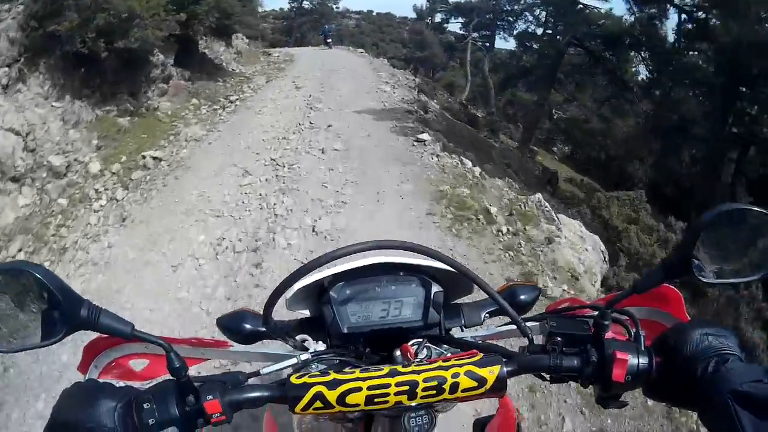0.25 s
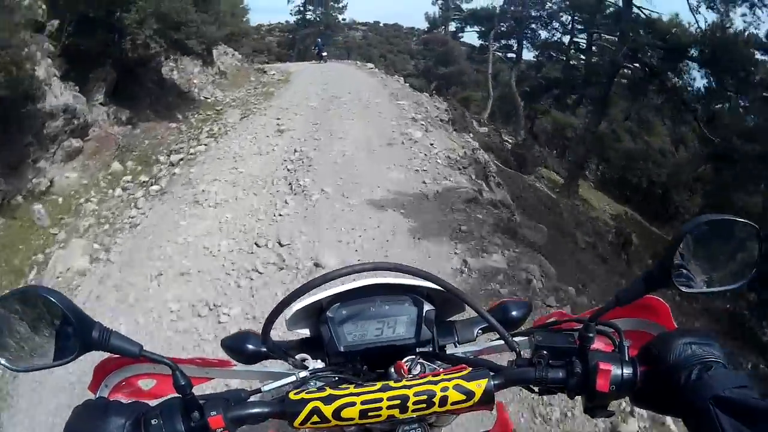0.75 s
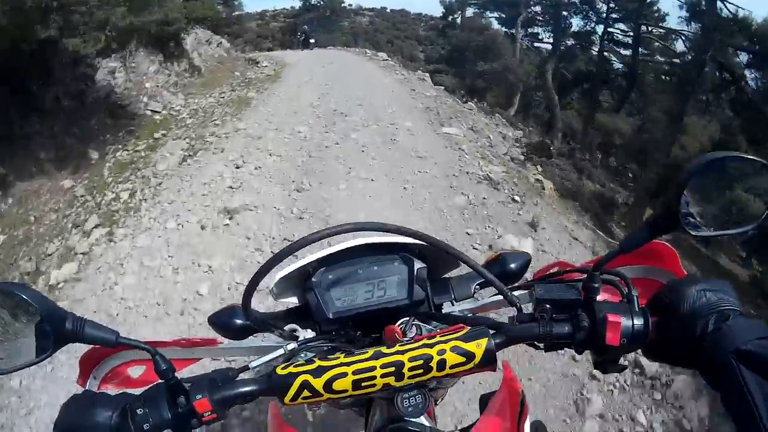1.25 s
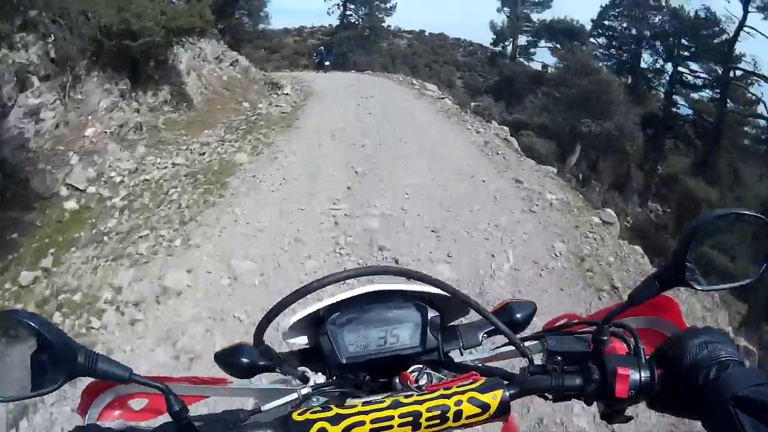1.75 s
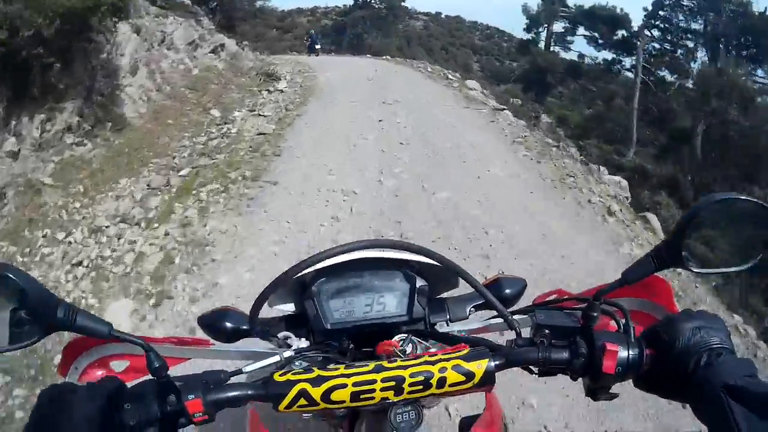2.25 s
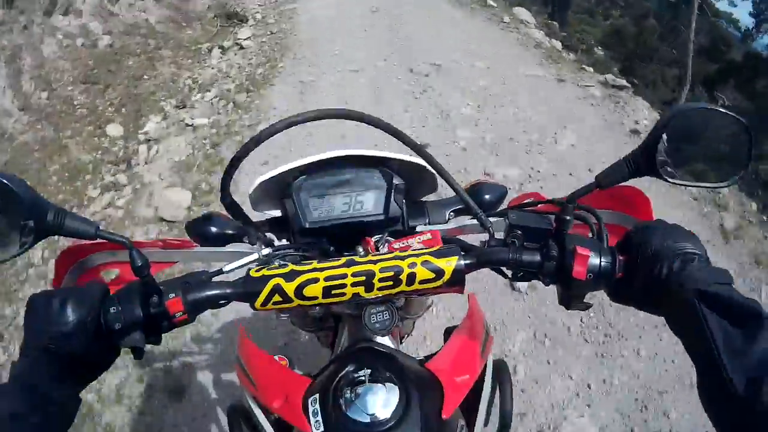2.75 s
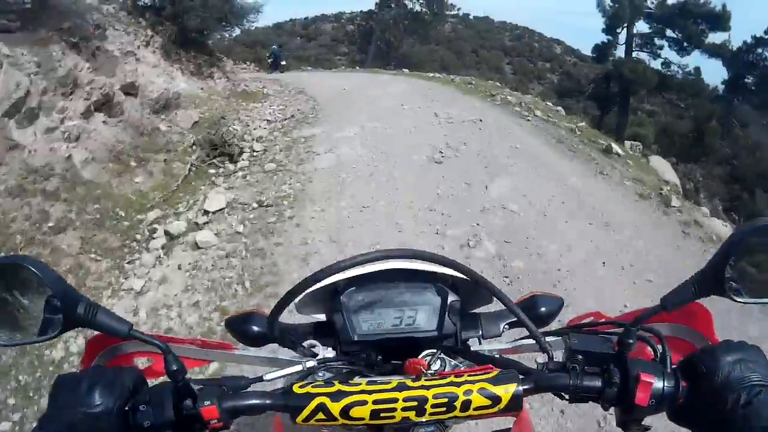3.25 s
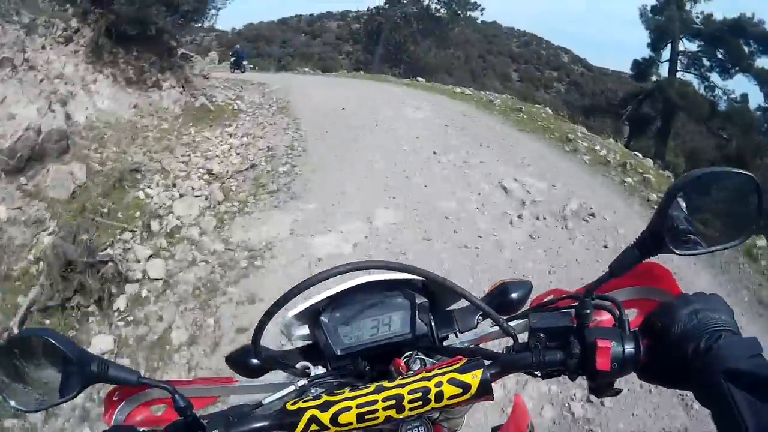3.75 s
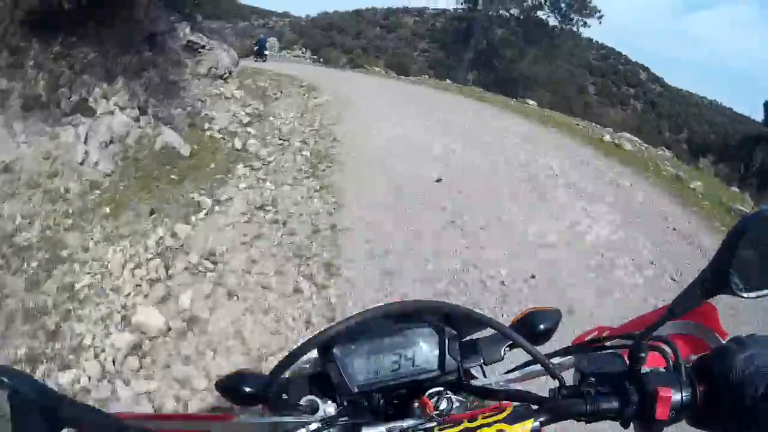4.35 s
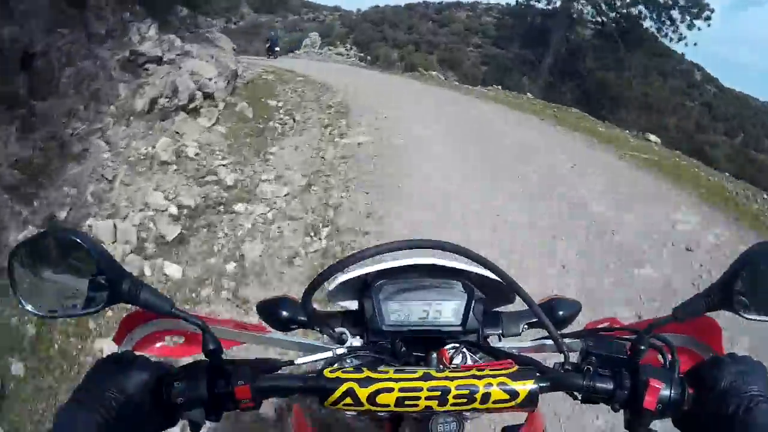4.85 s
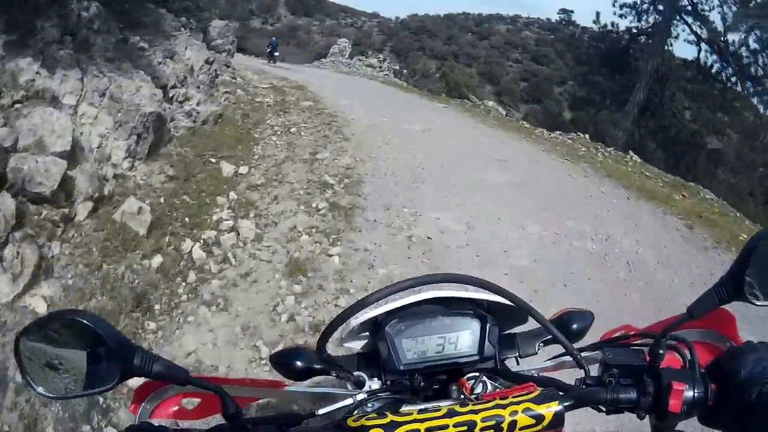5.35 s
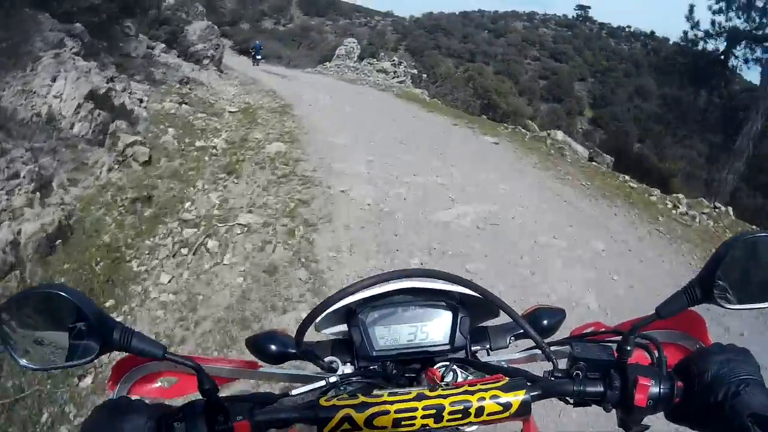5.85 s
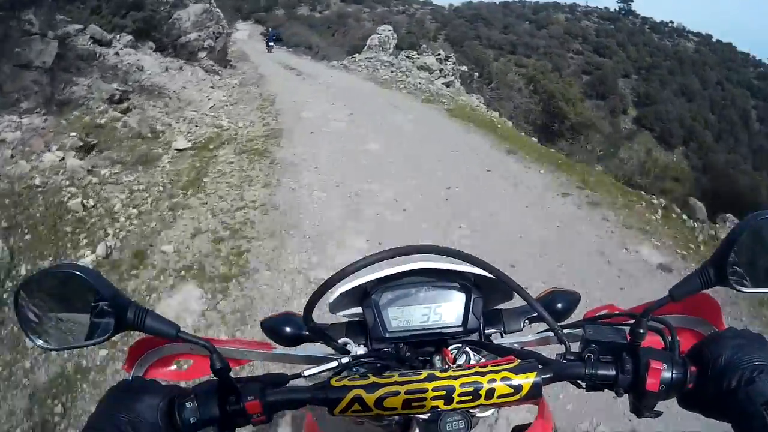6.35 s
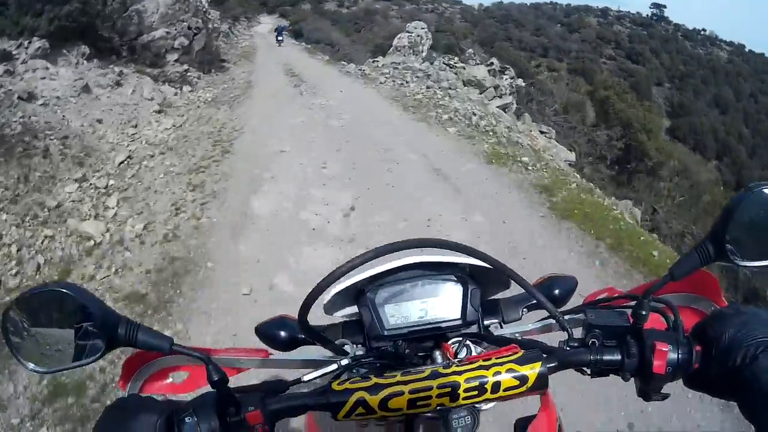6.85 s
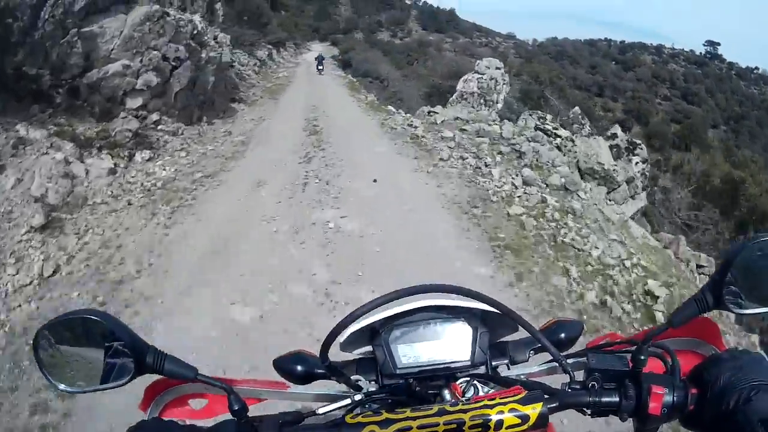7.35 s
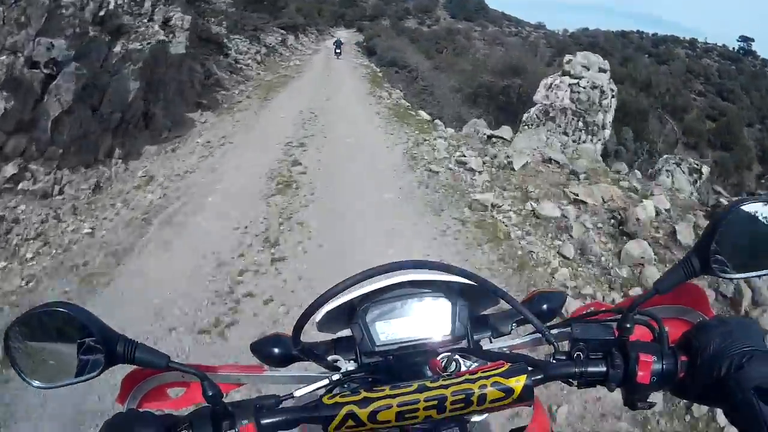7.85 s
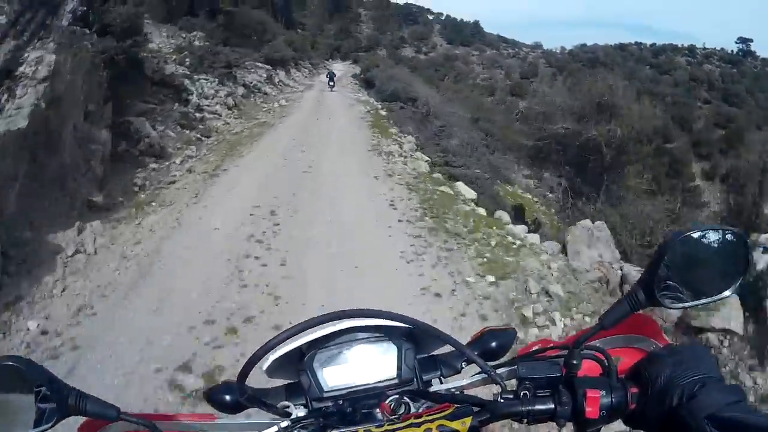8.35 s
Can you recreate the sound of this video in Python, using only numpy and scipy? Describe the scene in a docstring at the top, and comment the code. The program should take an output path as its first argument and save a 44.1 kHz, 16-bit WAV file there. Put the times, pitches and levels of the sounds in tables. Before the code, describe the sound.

Close, muffled onboard sound of a trail motorcycle on an open gravel hillside road. Rapid engine beats and metallic valve clatter run continuously, brighter with chain noise at first, then lower and calmer after the throttle shuts. A rough patch early on brings a cluster of dull knocks and rattles; later come scattered lighter bumps and one big bang. Gravel rumble, soft wind buffets and steady microphone hiss continue, without spacious echo.

```python
"""A single-cylinder four-stroke trail bike beats and clatters, heard from a closed camera housing on the rider.
Firings and valve gear ring the engine cases; the revs climb, drop, then pull gently again.
Stones on the track knock through the suspension and set the housing booming; grit crunches, loose metal jingles.
Pebbles tick against the bike; tyre rumble, air buffeting and a steady hiss lie underneath."""
import sys
import numpy as np
from scipy import signal
from scipy.fft import rfft, irfft, next_fast_len
from scipy.io import wavfile
from scipy.ndimage import uniform_filter1d

SR = 44100
rng = np.random.default_rng(int(sys.argv[2]) if len(sys.argv) > 2 else 0)


def unload_wav(signal):
    """Save mono or channel-first audio to the path in sys.argv[1] as 16-bit WAV at rate SR, clipped to [-1, 1]."""
    wavfile.write(
        sys.argv[1],
        SR,
        np.round(np.clip(np.atleast_2d(signal).T, -1, 1) * 32767).astype(np.int16),
    )


N = 379260
TIME_S = np.arange(N) / SR

# engine speed: (time [s], firing rate [Hz])
REVS = [(0, 37.7), (.55, 37.7), (.82, 38.2), (1.3, 39.4), (1.48, 38.6), (2.18, 41), (2.55, 41),
        (2.82, 38.8), (3.3, 31.5), (3.5, 28.8), (3.8, 28.1), (4.26, 29.8), (4.8, 28.4), (5.75, 28.7),
        (6.85, 29.4), (7.3, 29.7), (8.12, 30.4), (8.6, 31.1)]
# rasp before its makeup gain: (time [s], level [dB])
RASP_LEVEL = [(0, -62.5), (.9, -62), (1.63, -59), (2.35, -57.5), (3.0, -63), (4.25, -61.5), (5.1, -62.5),
              (5.9, -63), (7.6, -63.5), (8.6, -61.5)]
# gear mesh tones: (multiple of firing rate, rounded [1], level under drive before trim [dB], overrun change [dB])
GEARS = [(34, -66, 7), (52, -65.5, 16), (69.5, -54, -1)]
# track roughness over smooth gravel: (time [s], level [dB])
GROUND = [(0, 1.5), (.5, 0), (1.4, 4.5), (1.8, 8.5), (2.15, 7), (2.45, 8.5), (2.65, 3.5), (2.92, 7),
          (3.25, -0.5), (3.7, 4), (3.98, 2), (4.4, 2.5), (4.9, -2), (5.55, -1.5), (6.3, -3), (6.8, 4.5),
          (7.2, -1.5), (8.6, 0.5)]
# big stones, before layer trims: (time [s], thud [dB], boom re thud [dB], rattle re thud [dB])
KNOCKS = [(1.2607, -32.5, -2.5, -19), (1.387, -35, 5, -17), (1.5375, -36, -13, -9.5),
          (1.5855, -25, -20, -25), (1.6652, -24.5, -1, -24), (1.7143, -24.5, 0, -24),
          (1.755, -12.5, -3, -21.5), (1.8973, -38.5, 9, -15), (2.1936, -34.5, 7, -17.5),
          (2.4, -27.5, 8.5, -16), (2.4467, -9.5, -3.5, -30), (2.657, -36.5, 0, -17.5),
          (2.8948, -30.5, 4, -22), (2.9796, -20.5, -0.5, -46), (3.1558, -30.5, 1, -38),
          (3.493, -29, 4, -25), (3.705, -39, 9, -18.5), (3.8584, -38, 3, -31), (4.1254, -28, 2.5, -23),
          (4.2638, -35.5, 7.5, -32), (4.3121, -40, 14, -29), (4.352, -37, 10.5, -18),
          (4.4366, -29, 6.5, -38), (4.715, -33, 2, -32), (5.243, -38, 6, -30), (5.2687, -32, 2, -25),
          (5.449, -37.5, -8, -35), (5.6112, -37.5, 9.5, -29), (5.8588, -37, 8.5, -24.5),
          (6.0364, -41.5, 5, -37), (6.1968, -35, 3.5, -29), (6.24, -39.5, 4, -17),
          (6.5056, -26.5, -13.5, -23), (6.671, -31, 4, -28), (6.7506, -8.5, -1.5, -28),
          (6.9394, -34.5, 4, -26), (7.0112, -23, -6, -17.5), (7.3456, -29.5, 0, -27),
          (7.395, -38, 11.5, -25), (8.2007, -35.5, 3.5, -22)]
# spells of swinging loose metal: (start [s], length [s], level [dB])
JINGLES = [(1.53, .16, -57), (1.945, .13, -58), (2.183, .11, -53.5), (2.561, .48, -59), (4.109, .2, -55.5),
           (6.54, .22, -58.5)]
# flung pebbles, before makeup gain: (time [s], level [dB])
PEBBLES = [(1.5399, -49), (2.3999, -47.5), (2.7252, -52), (4.2892, -49), (4.36, -50), (6.752, -48),
           (7.0107, -53), (8.4726, -47)]

# resonances of engine block, engine cases and cam chain: (frequency [Hz], width [Hz], relative level [dB])
BLOCK_MODES = [(257.6, 27, 2.5), (481.7, 35, 2.5), (627, 20.4, 5), (1002, 19, -6.5)]
CASE_MODES = [(1324, 59.5, 2), (1640, 100, -5.5), (1768, 55.5, 3.5), (2173, 98, -3), (2332, 30, -5)]
CHAIN_MODES = [(2390, 50, 2), (2590, 90, -5), (2767, 103, -4.5), (2960, 82, 1.5), (4255, 114, -18.5)]
# resonances of frame, housing, springs, loose parts and jingling metal: same columns
FRAME_MODES = [(180, 29, 0.5), (243.7, 36.5, 1), (308.4, 41, -1), (368.3, 45, -1.5), (646, 15.5, -6.5)]
HOUSING_MODES = [(94.9, 8.8, -0.21)]
SPRING_MODES = [(58, 13.5, 1.5), (166, 15.8, 3.2)]
RATTLE_MODES = [(1355, 67, -1.5), (1593, 164, 4), (1674, 316, 1), (2240, 170, -15), (2800, 80, -7.5)]
JINGLE_MODES = [(6400, 70, -3), (8080, 28, 2), (10300, 70, -7), (11290, 35, 3), (11770, 32, 4),
                (13000, 70, -9), (15650, 40, -7)]

# spectra of exhaust, rasp, crunch, tyre rumble, air buffeting and hiss: (frequency [Hz], relative level [dB])
EXHAUST = [(20, 25), (38, 24), (76, 7), (105, -22), (150, 6), (220, -22), (270, 17), (340, -16), (420, 1),
           (700, -41), (1200, -66)]
RASP = [(300, 10), (700, 2.5), (1130, -8), (1300, 7), (2250, 5.5), (2550, -10), (3050, -2.5), (3400, -9),
        (3900, -5), (4450, -2), (4900, -11.5), (6100, -12.5), (7000, -27), (15000, -33)]
CRUNCH = [(200, -41), (330, -38), (500, 9), (660, 5), (800, -2), (1050, -6.5), (1400, -5.5), (2200, -21),
          (6000, -37), (15000, -63)]
RUMBLE = [(30, -23), (60, -34), (80, 1.5), (100, 6.5), (125, -3), (160, -0.5), (210, -3.5), (290, -4),
          (390, -19.5), (450, -20), (650, -14.5), (900, -51), (2500, -56)]
BUFFET = [(8, -5), (22, 11), (40, 2), (65, -5), (100, -37), (250, -32), (1000, -79)]
HISS = [(100, 7), (3000, 1), (7000, 2), (10000, 1), (14000, 0), (15500, -4.5)]

# engine: reference levels at CRUISE_HZ, before layer trims
CRUISE_HZ = 30
CLATTER_DB, CLATTER_DB_PER_OCTAVE = -53.5, 3
CHAIN_DB, CHAIN_DB_PER_OCTAVE = -66.5, 17
OVERRUN_HZ_PER_S = 13  # fall of the revs that counts as throttle fully shut
SURGE_RAD = .9  # swing of the mesh phase within a cycle
# suspension rebound: least delay, extra random delay, strength re stone, ceiling
REBOUND_S, REBOUND_SPREAD_S, REBOUND_DB, REBOUND_TOP_DB = .018, .02, -7.5, -38.5
# small stones on smooth gravel; shares are dB per dB of roughness
JOLTS_PER_S, JOLT_RATE_SHARE = 1.8, 1.8
JOLT_DB, JOLT_GROUND_SHARE, JOLT_SPREAD_DB = -45, 1, 4.5
LIGHT_BOOM_DB, LIGHT_RATTLE_DB = 6.5, -25  # rebounds and small stones: re thud, before trims
CRUNCH_ATTACK_S, CRUNCH_DECAY_S = 0.0015, 0.013
CRUNCH_DB, CRUNCH_THUD_SHARE = -20, 0.67  # at a 0 dB thud; dB per dB of thud
SWING_S, SWING_SPREAD_DB = .075, 2.2  # mean time between swings; spread of their strength
TYRE_DB = -52  # smooth gravel, before trim
BUFFET_DB, BUFFET_GROUND_SHARE = -57.5, 1.3  # before trim; dB per dB of roughness
SHAKE_DB, SHAKE_DECAY_S = -22, 0.06  # housing sway impulse re boom, before softening
TOP_HZ = 15700


def undb(db):
    """Decibels to gain."""
    return 10 ** (np.asarray(db) / 20)


def level(x, db):
    """Scale a sound to an rms level."""
    return x * undb(db) / np.sqrt(np.mean(x ** 2))


def curves(table):
    """Each column of a table as a line through time."""
    time_s, *columns = np.transpose(table)
    return [np.interp(TIME_S, time_s, column) for column in columns]


def walk(rate_hz):
    """Smooth random drift with an rms of 1."""
    hold = int(SR / rate_hz)
    draws = rng.standard_normal(400)[np.arange(N // hold + 1) % 400]
    held = np.repeat(draws, hold)
    smooth = uniform_filter1d(uniform_filter1d(held, hold), hold)
    return level(smooth[:N], 0)


def colour(x, points):
    """Filter by a spectrum, interpolated in dB over log frequency."""
    hz, db = np.transpose(points)
    size = next_fast_len(len(x) + SR // 4)
    bin_hz = np.maximum(np.arange(size // 2 + 1) * SR / size, 1)
    gain = undb(np.interp(np.log(bin_hz), np.log(hz), db))
    return irfft(rfft(x, size) * gain, size)[:len(x)]


def ring(x, modes, detune=0., scatter_db=0., signs=(1, -1)):
    """Drive resonances that swing with or against each other; the point of contact shifts pitch and share."""
    out = 0
    x = x + 1e-18 * np.cos(np.arange(len(x)))  # keeps the filters out of denormals
    for (hz, width_hz, db), sign in zip(modes, np.resize(np.sign(signs), len(modes))):
        shift, share = rng.standard_normal(2)
        mode_hz = min(hz * (1 + detune * shift), SR / 2 - 1)
        b, a = signal.iirpeak(mode_hz, hz / width_hz, fs=SR)
        out = out + sign * undb(db + scatter_db * share) * signal.lfilter(b, a, x)
    return out


def taps(times_s, sizes, size=N):
    """Impulses at the given times, each shared between two samples."""
    at = np.clip(np.asarray(times_s) * SR, 0, size - 2)
    i = at.astype(int)
    early = np.bincount(i, sizes * (1 - at + i), size)
    late = np.bincount(i + 1, sizes * (at - i), size)
    return early + late


def soften(x, contact_s):
    """A soft contact spreads each impulse into a short push."""
    pole = np.exp(-1 / (contact_s * SR))
    return signal.lfilter([(1 - pole) ** 2], [1, -2 * pole, pole ** 2], x + 1e-18)


def add(out, time_s, x, peak_db):
    """Mix in a sound at a time and peak level."""
    i = max(int(time_s * SR), 0)
    out[i:i + len(x)] += (x * undb(peak_db) / np.abs(x).max())[:N - i]


def cycle_taps(turns, places, sizes_db, jitter_s, scatter_db):
    """Taps at fixed places of every engine cycle, each a little early or late, strong or weak."""
    cycles = np.arange(turns[-1] // 1 - 1)[:, None] + np.clip(places, 0, 1)
    late, strong = rng.standard_normal((2, 400, len(places)))[:, :len(cycles)]
    times_s = np.interp(cycles, turns, TIME_S) + jitter_s * late
    sizes = undb(np.add(sizes_db, scatter_db * strong))
    return taps(times_s.ravel(), sizes.ravel())


def engine():
    """Firings and valve taps, timed by the engine cycle, drive exhaust, block, cases, chain, rasp and gears."""
    hz, = curves(REVS)
    octaves = np.log2(hz / CRUISE_HZ)
    clatter_db = CLATTER_DB + CLATTER_DB_PER_OCTAVE * octaves + .5 * walk(1.8)
    chain_db = CHAIN_DB + CHAIN_DB_PER_OCTAVE * octaves
    turns = np.cumsum(hz * (1 + .0012 * walk(14))) / SR  # engine cycles, one firing each
    firings = cycle_taps(turns, [0], [0], jitter_s=.00006, scatter_db=1.2)
    valves = valve_gear(turns)
    # sliding parts hiss, swelling with the cycle and with each turn of the crank
    swell = 1 + 0.13 * np.cos(4 * np.pi * turns) + 0.1 * np.cos(2 * np.pi * turns)
    case_hiss, chain_hiss, rasp_hiss = swell * rng.standard_normal((3, N))
    out = exhaust(firings, clatter_db) + block(valves, firings, clatter_db)
    out = out + cases(valves, case_hiss, clatter_db) + cam_chain(valves, chain_hiss, chain_db)
    return out + rasp(valves, rasp_hiss) + gear_whine(hz, turns)


def valve_gear(turns):
    """Valves opening and seating and piston slap tap at fixed places in the cycle."""
    places = [0, .12, .23, .35, .52, .58, .72, .84, .93]
    sizes_db = [0, -4, -4, -1, 0, 1, -6, -2, -4]
    return level(cycle_taps(turns, places, sizes_db, jitter_s=.000045, scatter_db=2.5), 0)


def exhaust(firings, clatter_db):
    """One low pressure pulse per firing."""
    return level(colour(firings, EXHAUST), -2.5) * undb(clatter_db)


def block(valves, firings, clatter_db):
    """Valve taps and firings ring the engine block."""
    return level(ring(valves + level(firings, 0), BLOCK_MODES), -6.5) * undb(clatter_db)


def cases(valves, friction, clatter_db):
    """Valve taps and friction ring the thinner engine cases."""
    return level(ring(valves + .8 * friction, CASE_MODES), -.7) * undb(clatter_db + .8 * walk(22))


def cam_chain(valves, friction, chain_db):
    """Valve taps and friction ring the chain, which loudens steeply with the revs."""
    return level(ring(valves + friction, CHAIN_MODES), 0.37) * undb(chain_db + 0.86 * walk(20))


def rasp(valves, friction):
    """Friction noise with a trace of valve taps, coloured bright."""
    rasp_db, = curves(RASP_LEVEL)
    return level(colour(undb(-23) * valves + friction, RASP), 9.45) * undb(rasp_db + .5 * walk(49))


def gear_whine(hz, turns):
    """Mesh tones with sidebands from the once-a-cycle crank surge swell where they meet a case resonance."""
    surge_rad = SURGE_RAD * np.sin(2 * np.pi * turns) + .8 * walk(40)
    falling_hz_per_s = uniform_filter1d(-np.gradient(hz, TIME_S), SR // 5)
    overrun = np.clip(falling_hz_per_s / OVERRUN_HZ_PER_S, 0, 1)
    mesh = 0
    for multiple, drive_db, overrun_db in GEARS:
        tone = np.sin(2 * np.pi * round(multiple) * turns + surge_rad)
        mesh = mesh + tone * undb(drive_db + overrun_db * overrun + 3.2 * walk(16))
    return undb(-2.0) * ring(mesh, CASE_MODES)


def knocks():
    """Each blow thuds the frame, booms the housing, bounces loose parts and crunches grit under the tyre."""
    out = np.zeros(N)
    for time_s, thud_db, boom_db, rattle_db in jolts():
        # hard hits bottom the suspension in one blow; light ones vary more
        loose = np.interp(thud_db, [-30, -16], [1, .2])
        add(out, time_s, frame_thud(loose), thud_db + .5)
        add(out, time_s, housing_boom(loose), thud_db + boom_db - 1.5)
        add(out, time_s, rattle(), thud_db + rattle_db + 12.0)
        add(out, time_s, crunch(), CRUNCH_DB + CRUNCH_THUD_SHARE * thud_db)
    return out


def jolts():
    """Every blow to the wheels: big stones, their rebounds, and small stones that crowd on rough ground."""
    slot_s = .025
    slots_s = np.arange(0, N / SR - .1, slot_s)
    luck, late = rng.random((2, len(slots_s)))
    rough_db = np.interp(slots_s, *np.transpose(GROUND))
    met = luck < JOLTS_PER_S * undb(JOLT_RATE_SHARE * rough_db) * slot_s
    small_db = JOLT_DB + JOLT_GROUND_SHARE * rough_db + JOLT_SPREAD_DB * rng.standard_normal(len(slots_s))
    light = list(zip((slots_s + late * slot_s)[met], small_db[met]))
    for time_s, thud_db, _, _ in KNOCKS:
        rebound_s = time_s + REBOUND_S + REBOUND_SPREAD_S * rng.random()
        light.append((rebound_s, min(thud_db + REBOUND_DB, REBOUND_TOP_DB)))
    return list(KNOCKS) + [(time_s, db, LIGHT_BOOM_DB, LIGHT_RATTLE_DB) for time_s, db in light]


def frame_thud(loose):
    """The frame rings to a blow and a second edge, which is weaker in hard hits."""
    edges_s = [0, 0.00521 + 0.01214 * rng.random()]
    blow = soften(-taps(edges_s, np.array([1, 0.55 * loose]), SR // 4), 0.00027)
    return ring(blow, FRAME_MODES, detune=.07 * loose, scatter_db=3 * loose, signs=(1, 1, -1, -1))


def housing_boom(loose):
    """One push booms the housing; in light hits the springs add a dull heave."""
    push = soften(-taps([0], np.ones(1), SR // 4), 0.00026)
    boom = ring(push, HOUSING_MODES, detune=.05 * loose)
    heave = ring(push, SPRING_MODES, detune=.12, scatter_db=3)
    return boom + 0.56 * loose * heave


def rattle():
    """Loose parts chatter for a few milliseconds, each bounce weaker than the last."""
    bounce, chance = np.arange(5), rng.random(5)
    times_s = 0.00034 + .0024 * (bounce + chance - chance[0])
    bounces = taps(times_s, undb(-1.5 * bounce), SR // 4)
    return ring(soften(bounces, .0001), RATTLE_MODES, detune=0.005, scatter_db=1.0)


def crunch():
    """Coloured grit noise that grows more slowly than the blow, then dies away."""
    t_s = TIME_S[:SR // 4]
    envelope = np.exp(-t_s / CRUNCH_DECAY_S) * (1 - np.exp(-t_s / CRUNCH_ATTACK_S))
    return colour(rng.standard_normal(len(t_s)) * envelope, CRUNCH)


def jingles():
    """Small loose metal parts swing unevenly for a spell and touch several times on each swing."""
    out = np.zeros(N)
    for start_s, length_s, db in JINGLES:
        for swing_s in np.arange(start_s, start_s + length_s, SWING_S):
            touches_s = np.append(0, 0.09 * rng.random(6))
            sizes = np.append(.7, rng.uniform(0.36, 1, size=6))
            chime = ring(taps(touches_s, sizes, SR // 4), JINGLE_MODES, detune=.002, scatter_db=4)
            time_s = swing_s + SWING_S * (rng.random() - .5)
            add(out, time_s, chime, db + SWING_SPREAD_DB * rng.standard_normal())
    return out


def pebbles():
    """The front tyre flings pebbles: short noise bursts ring one broad mode as they tick against the bike."""
    out, t_s = np.zeros(N), TIME_S[:SR // 20]
    for time_s, db in PEBBLES:
        chip = rng.standard_normal(len(t_s)) * np.exp(-t_s / 0.0055)
        tick = ring(soften(chip, .00003), [(4050, 820, 0)], detune=0.11)
        add(out, time_s, tick, db + 4.0)
    return out


def tyre_rumble(rough_db):
    """Tyres drum over gravel; on rougher ground more of the noise comes as separate bumps."""
    ground_db = TYRE_DB + rough_db + 0.47 * walk(6.3)
    sizes = undb(3.5 * np.minimum(rng.exponential(size=700), 3)) * rng.choice([-1, 1], size=700)
    bumps = taps(rng.uniform(0, N / SR, size=700), sizes)
    lumpy = np.interp(ground_db, [-52, -43], [.2, .8])  # power share of the bumps
    drive = np.sqrt(lumpy) * level(bumps, 0) + np.sqrt(1 - lumpy) * rng.standard_normal(N)
    return level(colour(drive, RUMBLE), -0.23) * undb(ground_db + 1.0 * walk(47))


def buffeting(rough_db):
    """Air buffets the shaken housing in gusts, stronger on rough ground and while it sways after a big stone."""
    time_s, thud_db, boom_db, _ = np.transpose(KNOCKS)
    shakes = taps(time_s, undb(thud_db + boom_db + SHAKE_DB))
    sway = signal.lfilter([1], [1, -np.exp(-1 / (SHAKE_DECAY_S * SR))], shakes)
    air = np.hypot(undb(BUFFET_DB + BUFFET_GROUND_SHARE * rough_db), soften(sway, 0.0049))
    return level(colour(rng.standard_normal(N), BUFFET), 0.17) * air * undb(0.91 * walk(7.5))


def microphone_hiss():
    """Steady coloured noise of the microphone."""
    return level(colour(rng.standard_normal(N), HISS), -68.0)


def scene():
    """The bike and the track over the hiss, as one channel."""
    rough_db, = curves(GROUND)
    bike = engine() + knocks() + jingles() + pebbles()
    background = tyre_rumble(rough_db) + buffeting(rough_db) + microphone_hiss()
    return (bike + background)[None]


def record(dry):
    """The camera cuts the top of the treble with a steep low-pass."""
    return signal.sosfilt(signal.ellip(10, .2, 80, TOP_HZ, fs=SR, output="sos"), dry)


dry = scene()
out = record(dry)
unload_wav(out)
```